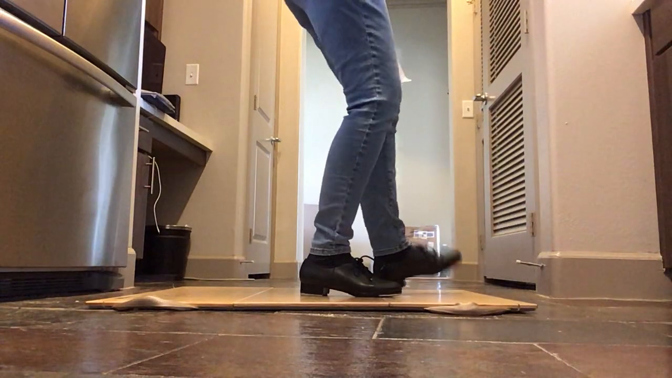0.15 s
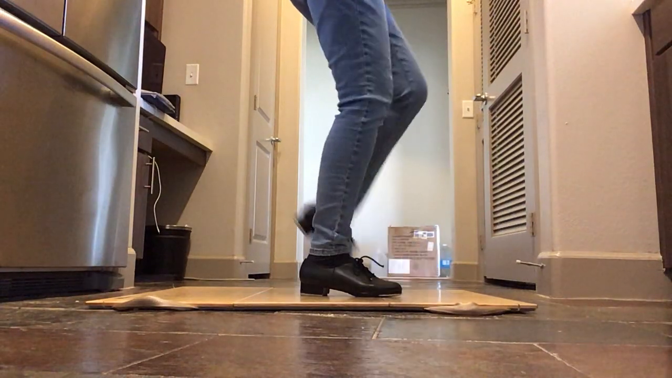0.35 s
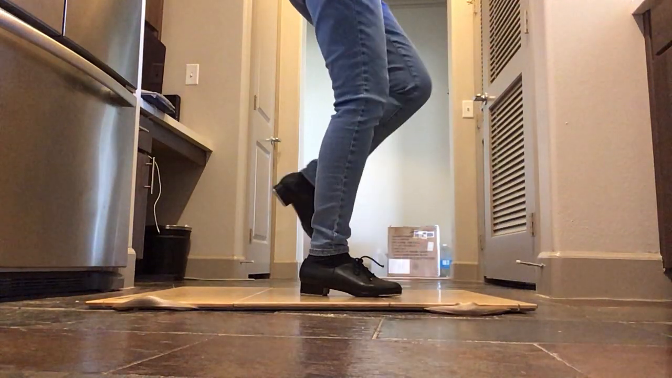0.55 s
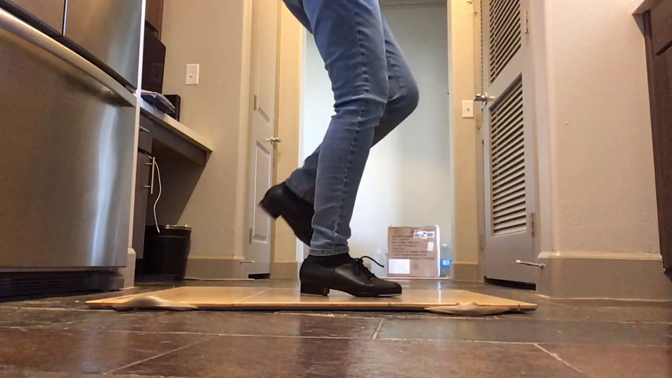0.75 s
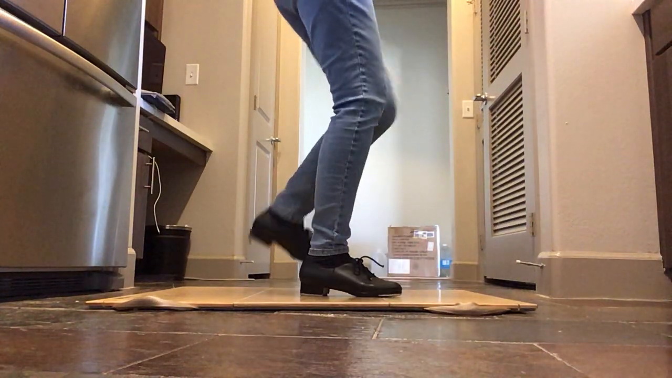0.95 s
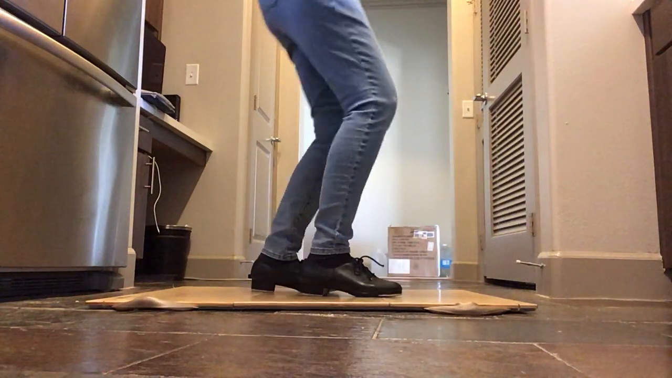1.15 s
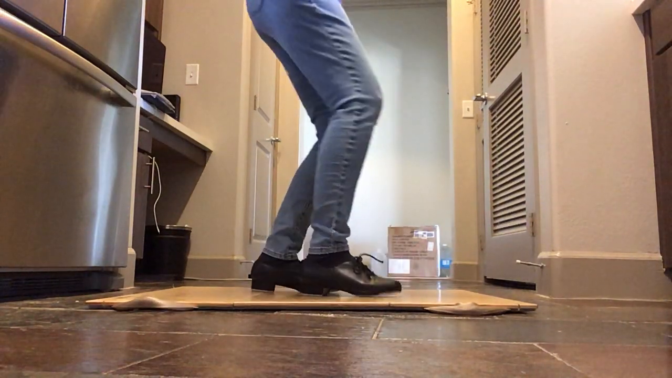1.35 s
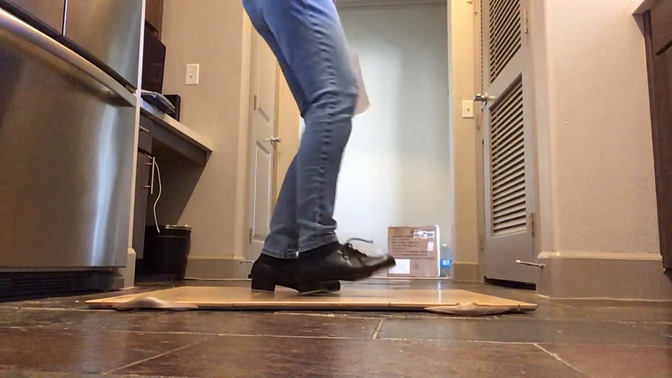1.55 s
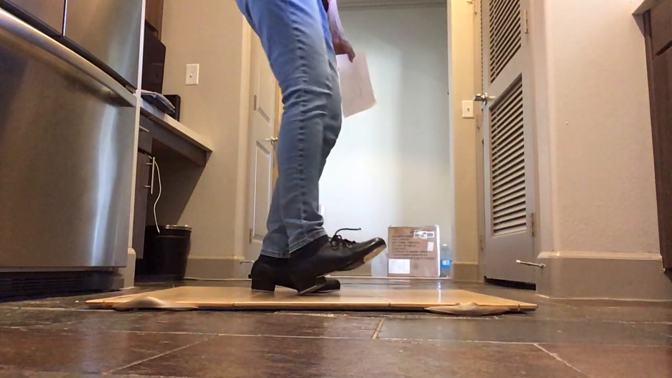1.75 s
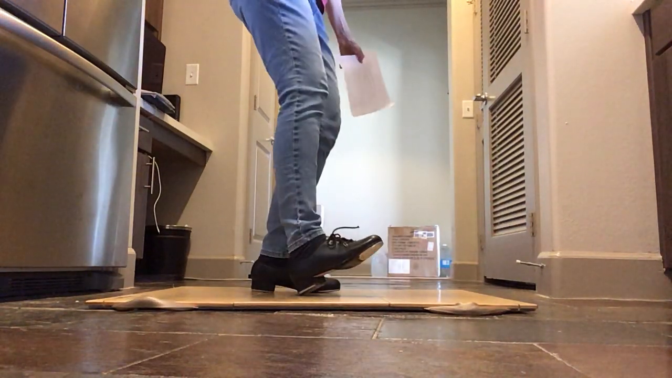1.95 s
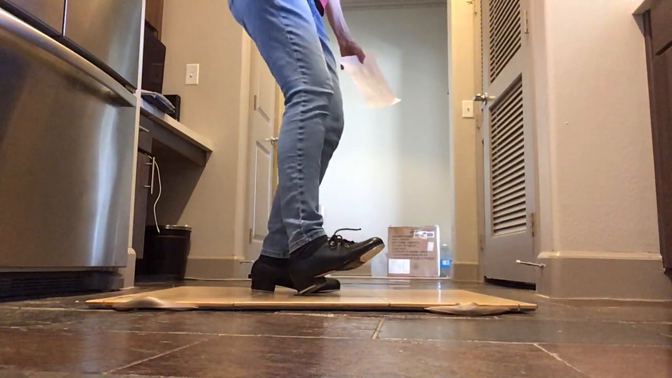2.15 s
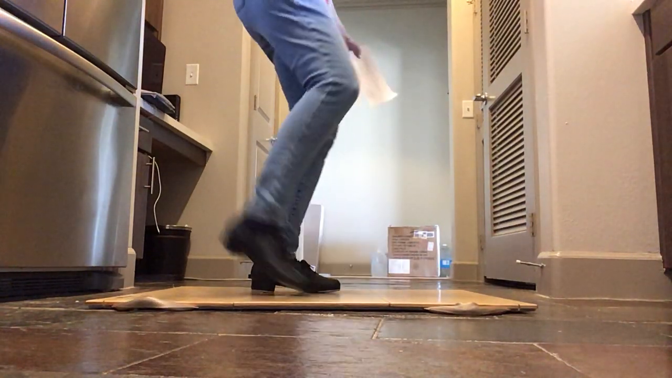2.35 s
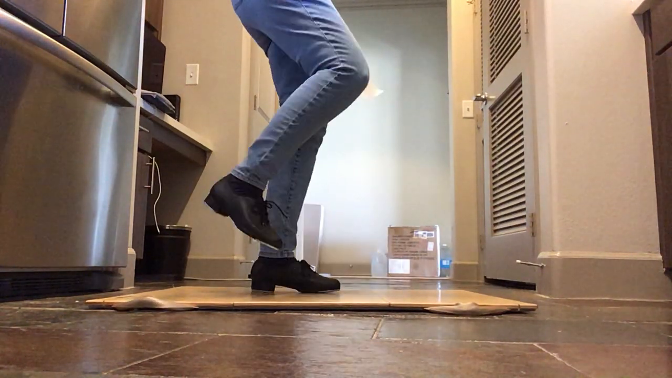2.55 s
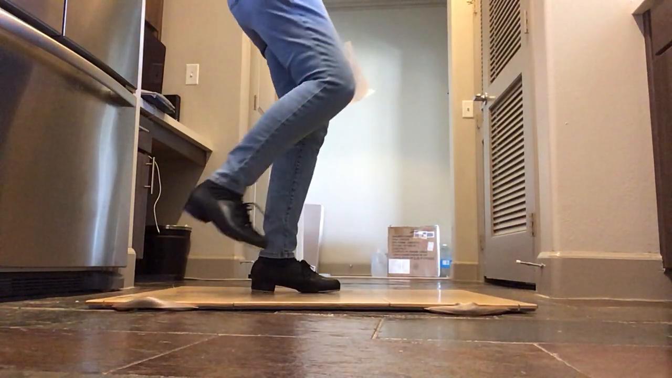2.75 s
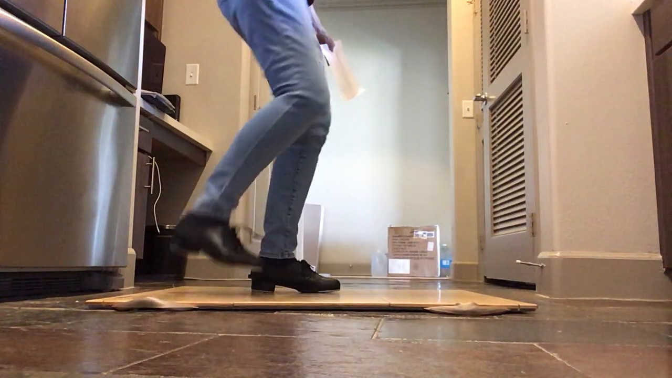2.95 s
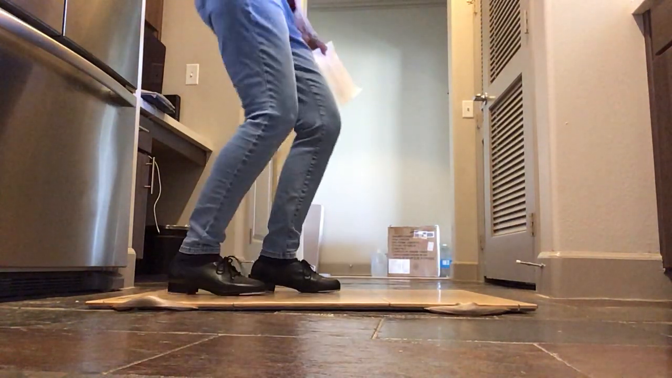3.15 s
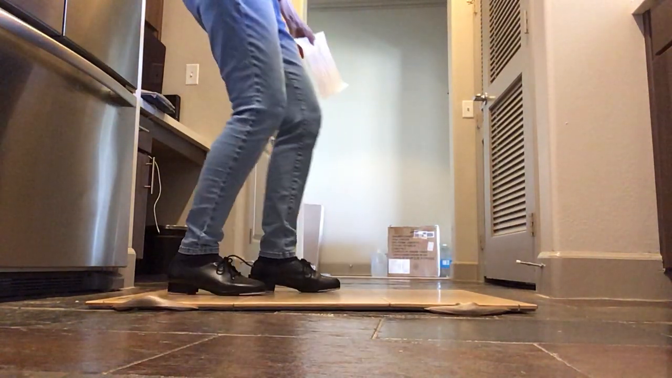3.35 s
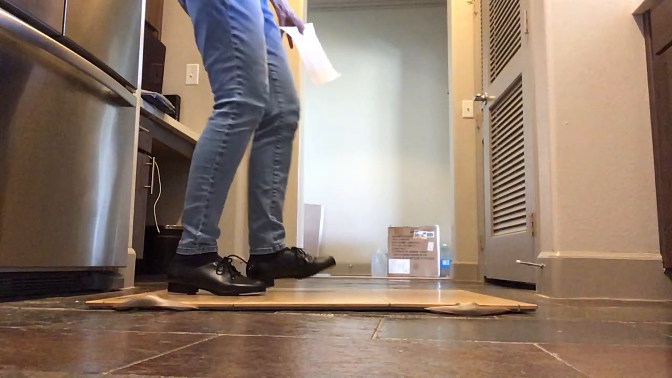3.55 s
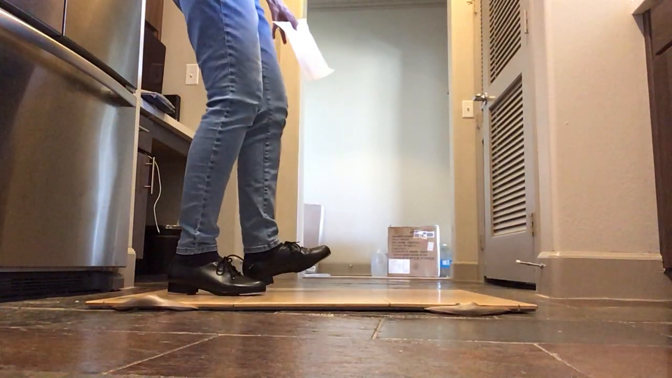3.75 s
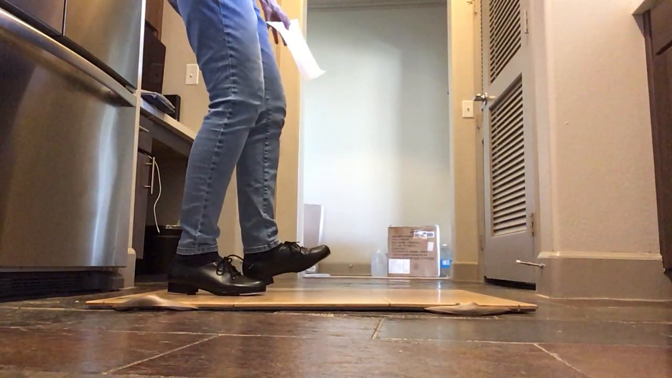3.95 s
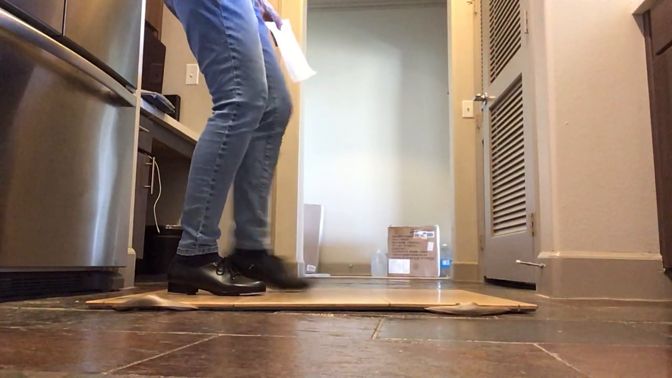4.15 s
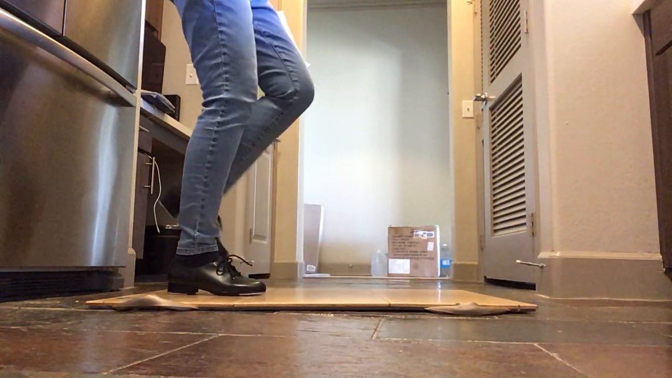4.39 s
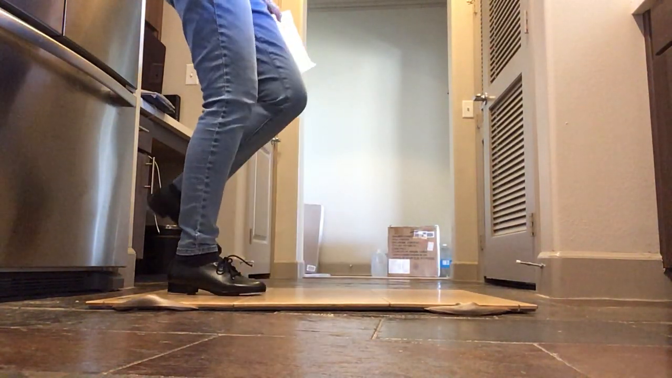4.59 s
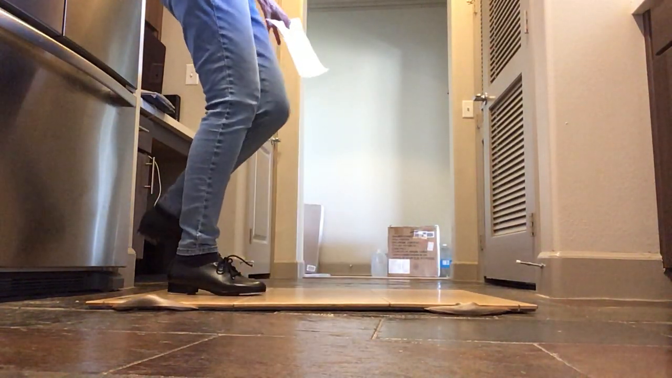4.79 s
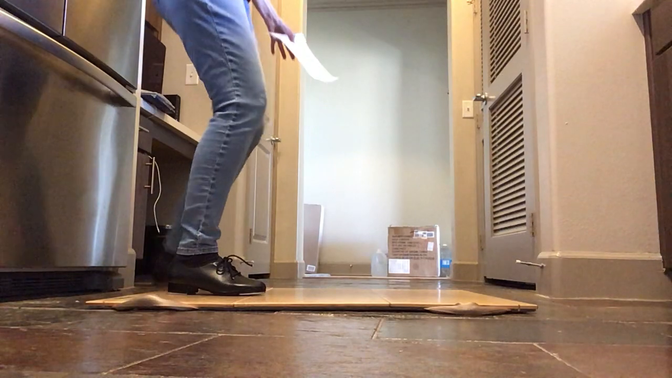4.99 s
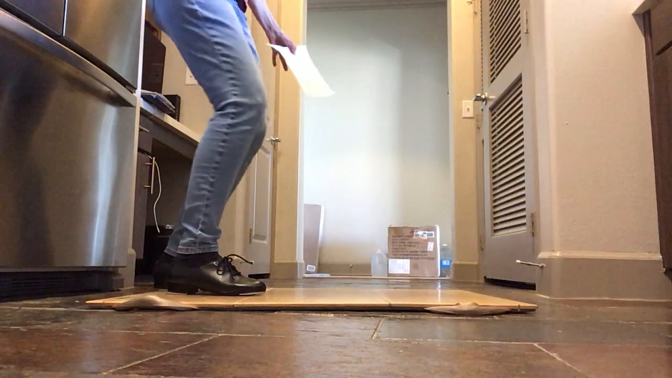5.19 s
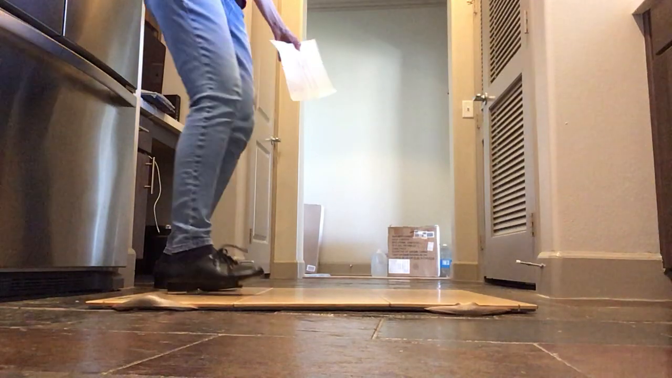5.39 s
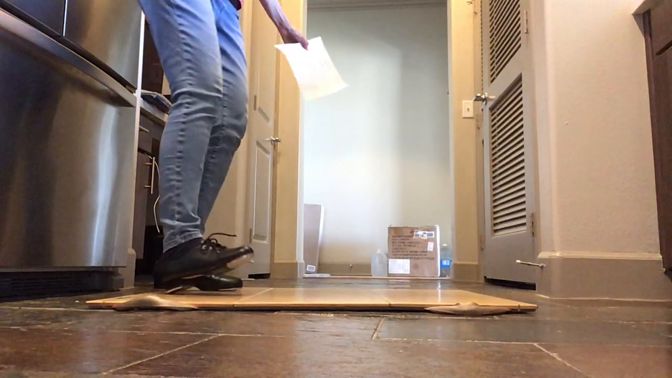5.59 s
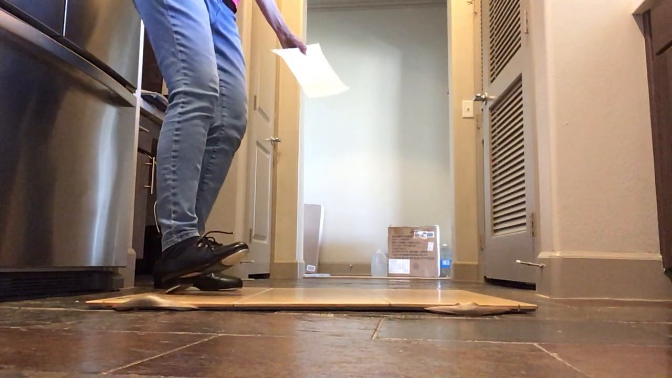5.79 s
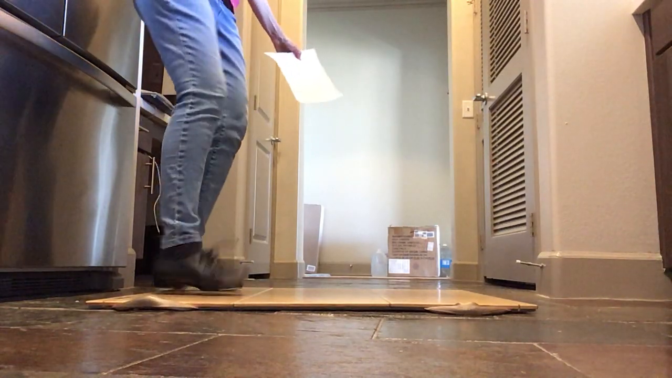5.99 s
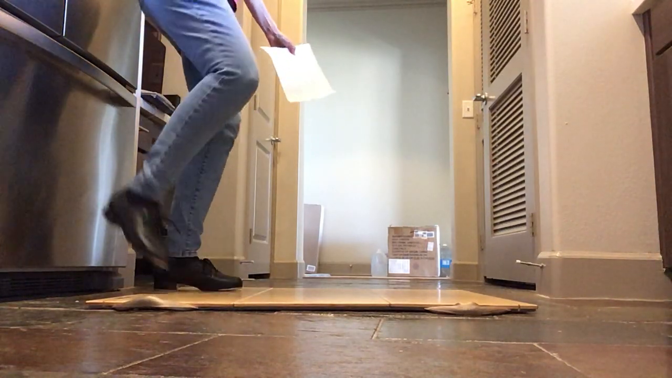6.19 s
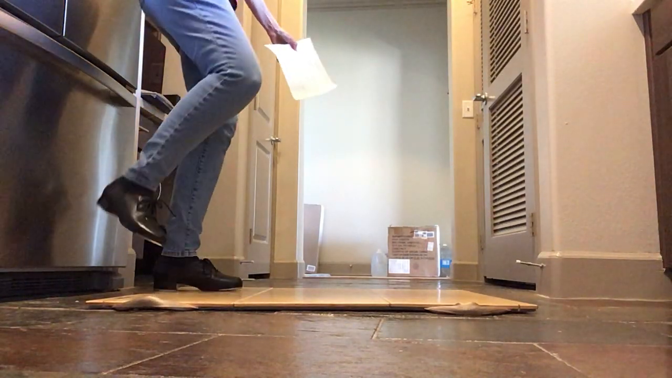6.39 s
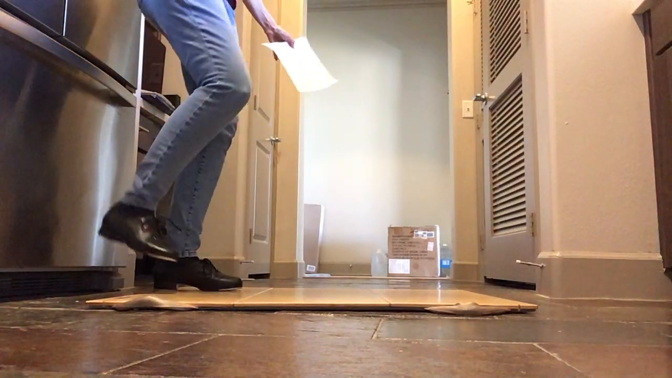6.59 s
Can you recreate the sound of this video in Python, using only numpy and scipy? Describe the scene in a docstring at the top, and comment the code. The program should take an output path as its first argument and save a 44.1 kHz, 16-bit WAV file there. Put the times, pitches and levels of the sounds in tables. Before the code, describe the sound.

Indoors, close to the floor, metal-plated shoes strike a plywood board seven times, roughly one second apart. Crisp forward and backward brushes alternate with slightly weightier, softer steps. Each tap is a very short metallic crack with a hollow woody knock, followed by a bright, quickly fading echo from hard walls. Faint sole scuffs come just before the brushes. Low appliance hum and slight hiss stay beneath.

```python
"""Seven slow taps of metal-plated shoes on a plywood board in a tiled hallway, heard from the floor.
Each tap is a few metal contacts milliseconds apart, made of plate ring and a noisy crack,
and blows set the board's own tones ringing. Soles scuff the wood before the brushing taps; short puffs
of band noise, most of them faint, join in. The hard walls answer with a bright tail of echoes and fading
noise. Appliances hum low, as narrow bands of noise, under the microphone hiss."""
import sys
import numpy as np
from scipy import signal
from scipy.fft import rfft, irfft
from scipy.io import wavfile
from scipy.ndimage import uniform_filter1d

SR = 44100
rng = np.random.default_rng(int(sys.argv[2]) if len(sys.argv) > 2 else 0)


def unload_audio(sound):
    """Save the sound as a 16-bit wav file, at the path given as the first command line argument."""
    columns = np.transpose(np.atleast_2d(sound))
    # keep every value between -1 and 1, then stretch to whole-number steps
    steps = np.round(np.clip(columns, -1, 1) * 32767)
    wavfile.write(sys.argv[1], SR, steps.astype(np.int16))


def magnitude_from_level(level_db):
    """Linear magnitude for a level in decibels (20 dB per decade)."""
    exponent = np.asarray(level_db, float) / 20
    return 10 ** exponent


N = 292383  # length of the scene in samples

# All levels are relative: later stages add to them.
# Toe plate swept across the wood. Each row: start in seconds, level in dB, plate pitch at first touch in Hz,
# length of the roll in seconds, brightness of the crack in dB per octave.
BRUSHES = [(0.3181, -7.5, 2290, 0.0021, 2.5), (2.3655, -7, 2680, .0026, 2),
           (4.2546, -6.5, 2204, .0024, 1.6), (6.1166, -9.5, 2360, .0015, 0)]
# Foot set down with weight. Each row: the same columns as the brushes.
STEPS = [(1.1993, -10, 1995, 0.0027, 1.1), (3.1625, -9, 2155, .0038, 0.83),
         (5.1015, -13.5, 1410, .0046, 0.75)]
# The plate rolls from edge to flat, one touch a row. Each row: share of the roll time gone by,
# how flat the plate lies from 0 to 1, ring level in dB, crack level in dB.
BRUSH_ROLL = [(0, 0, -3, -0.5), (1.0, 1.0, -1, -2), (1.8, 0.99, -16, -7.5)]
STEP_ROLL = [(0, 0, -4, -7), (.3, .3, -5, -6), (.55, .1, -7.5, -6.5), (1.0, 0.96, -2.5, 2.35)]
BRUSH_FLAT_HZ, STEP_FLAT_HZ = 2700, 2990  # plate pitch once it lies flat
# Tones of the metal plate. Each row: multiple of its pitch, level in dB, time to fall 60 dB in seconds.
PLATE_TONES = [(1.0, 2.5, 0.0056), (1.448, -10, 0.004), (2.402, -17, .005)]
# Colour of metal cracking on wood. Each row: frequency in Hz, level in dB.
CRACK_COLOUR = [(300, -28.5), (1200, -15), (2500, 1.7), (4500, 7), (6500, 4), (9000, -2.6), (12000, -4.5),
                (16000, -14)]

# Blows on the board. Each row: start in seconds, level in dB, tilt in dB per octave,
# weight from 0 to 1, spot struck as a share of the board length.
BLOWS = [(0.3183, -20, 1.25, 0.67, .33), (1.198, -21, -2, 0.78, 0.3), (2.366, -23, 2.1, 0.2, .31),
         (3.1627, -23, -1.1, 1, .76), (3.503, -51, -10.5, .05, .3), (4.255, -19, -2.15, 0, .32),
         (5.1017, -27.5, -2, 0.9, 0.725), (6.1171, -29.5, 6.8, 0, 0.35)]
# Ringing modes of the board. Each row: frequency in Hz, level in dB, time to fall 60 dB in seconds.
BOARD_MODES = [(115, -2, 0.24), (133, -6.5, 0.12), (175, 1, 0.098), (222, 0, 0.14), (268, -4.5, 0.23),
               (296, -4.5, 0.18), (334, -5, .15), (381.6, -5.5, 0.13), (420.8, -5, 0.14), (462, 0, 0.05),
               (551, -1, 0.052), (626, 0.5, .06), (718, 3.5, 0.033), (992, -4.5, 0.033),
               (1144, -3.5, 0.015), (1390, -7.5, 0.054), (1844, -2.5, 0.023)]
# How a landing drives the board, glancing or weighted. Each row: frequency in Hz, level in dB.
GLANCING = [(110, -18), (250, -4.5), (430, -2), (680, 0.2), (1300, -6)]
WEIGHTED = [(110, -10), (250, -3), (430, 0.1), (680, -2), (1300, 8)]
NODE_LEAK = 0.23  # what a mode still gives when struck on its still line

# Soles grazing the wood just before a brush. Each row: time of the peak in seconds, level in dB.
SCUFFS = [(.263, -54), (2.314, -55), (4.197, -55), (6.064, -59)]
# Colour of the scuffs. Each row: frequency in Hz, level in dB.
SCUFF_COLOUR = [(100, -9), (300, 8), (550, 8), (1000, -6), (2700, -5), (5000, -19), (9000, -36),
                (16000, -54)]
SCUFF_RISE_S, SCUFF_FALL_S = 0.011, 0.005
# Short puffs of band noise, most of them faint. Each row: start in seconds, level in dB,
# centre in Hz, width in Hz.
PUFFS = [(0.294, -62, 2600, 2000), (1.069, -71.5, 2194, 1480), (3.54, -69, 12840, 6015),
         (3.547, -83, 11480, 6000), (3.565, -82.5, 12040, 7070), (4.232, -48, 2400, 1496),
         (4.938, -61, 2800, 3060), (5.674, -70.5, 2930, 2440)]

# First echoes from the walls. Each row: delay in seconds, level in dB.
ECHOES = [(.0071, -14), (.0105, -13), (0.0164, -12), (.0185, -13), (.024, -13)]
# How long the hallway rings. Each row: frequency in Hz, time to fall 60 dB in seconds.
HALL_FADE = [(100, 1), (300, 0.94), (800, 0.53), (2000, 0.37), (5000, 0.26), (9000, 0.27), (15000, 0.31)]
# Colour of the whole ringing tail. Each row: frequency in Hz, level in dB.
TAIL_COLOUR = [(100, -5), (300, -7.5), (800, 1.8), (1500, -2.5), (2600, -8), (4000, 3.65), (6500, 0.7),
               (10000, 5.5), (15000, -2)]
# The larger rooms beyond ring on. Each row: frequency in Hz, time to fall 60 dB in seconds.
BEYOND_FADE = [(200, 0.25), (1000, 0.79), (4000, 0.76), (8000, 0.61), (12000, 0.32), (15500, .28)]
BEYOND_DB = 4  # energy of the rooms beyond, against the hallway
DIRECT_DB = 3  # sound that reaches the microphone without a reflection

# Colour of the rumble and hiss. Each row: frequency in Hz, level in dB per Hz, before evening out.
AIR_COLOUR = [(18, -50.5), (30, -22), (43, -15.5), (90, -12), (109, -9.5), (174, -9.5), (204, 0),
              (266, -23.5), (295, -15.5), (461, -34.5), (512, -27), (889, -34.5), (1590, -37.5),
              (14800, -49), (16000, -58)]
AIR_DB = -58.5
# Wavering appliance tones. Each row: centre in Hz, width in Hz, level in dB.
HUMS = [(64, 4.8, -76.5), (118, 1.5, -66.5), (183, 33, -76)]


def evened(x):
    """Scale a sound to an average (rms) strength of 1."""
    return x / np.sqrt(np.mean(x ** 2) + 1e-20)


def read_curve(points, hz):
    """Read a table between its points, on a logarithmic frequency scale."""
    table_hz, value = np.transpose(points)
    return np.interp(np.log(hz + 1), np.log(table_hz + 1), value)


def add(mix, start_s, sound):
    """Lay a sound into the mix at its start time, cut off at the end of the mix."""
    part = mix[round(start_s * SR):][:len(sound)]
    part += sound[:len(part)]


def ring(hz, db, t60):
    """One dying tone: a sine that falls 60 dB in t60 seconds."""
    t = np.arange(SR // 2) / SR
    return magnitude_from_level(db - 60 * t / t60) * np.sin(2 * np.pi * hz * t)


def coloured(points, size):
    """Noise with the given balance of bass and treble, at rms 1."""
    hz = np.fft.rfftfreq(size, 1 / SR)
    spectrum = rfft(rng.standard_normal(size)) * magnitude_from_level(read_curve(points, hz))
    return evened(irfft(spectrum, size))


def strike(plate_db, pitch_hz, crack_db, tilt_db):
    """One metal contact: the powers of plate ring and broad crack add up, in a pulse that starts at once."""
    hz = np.fft.fftfreq(2048, 1 / SR)
    power = np.zeros(2048)
    for multiple, db, t60 in PLATE_TONES:
        tone = ring(multiple * pitch_hz, plate_db + db, t60)[:2048]
        power += abs(np.fft.fft(tone)) ** 2
    octaves = np.log2(np.maximum(abs(hz), 1500) / 4000)
    power += magnitude_from_level(2 * (crack_db + read_curve(CRACK_COLOUR, abs(hz)) + tilt_db * octaves))
    # minimum phase: these phases put the energy as early as the colour allows
    level = np.log(power) / 2
    phase = -signal.hilbert(level).imag
    return np.fft.ifft(np.exp(level + 1j * phase)).real[:1024]


def touches(roll, flat_hz, start_s, db, edge_hz, roll_s, tilt_db):
    """The contacts of one tap; the plate rings higher the flatter it lies."""
    contacts = []
    for share, flat, ring_db, crack_db in roll:
        pitch_hz = edge_hz * (flat_hz / edge_hz) ** flat
        contact = strike(db + ring_db, pitch_hz, db + crack_db, tilt_db)
        contacts.append((start_s + share * roll_s, contact))
    return contacts


def knock(blow_db, tilt_db, weight, spot):
    """The blow spreads through the board, so each mode sets in a little apart and the bass builds slowly."""
    t = np.arange(SR // 2) / SR
    out = np.zeros(SR)
    lowest_hz = BOARD_MODES[0][0]
    for k, (hz, db, t60) in enumerate(BOARD_MODES):
        landing_db = (1 - weight) * read_curve(GLANCING, hz) + weight * read_curve(WEIGHTED, hz)
        drive_db = blow_db + tilt_db * np.log2(hz / 430) + landing_db
        # the spot struck decides how strongly each mode answers
        shape = np.hypot(NODE_LEAK, np.sin(np.pi * spot * np.sqrt(hz / lowest_hz)))
        build_up = np.minimum(t * hz / 0.5, 1)  # over half a cycle
        mode = (-1) ** k * shape * ring(hz, db + drive_db, t60) * build_up
        add(out, rng.uniform(0, 0.4) / hz, mode)
    return out[:SR // 2]


def scuff(db, rise, fall):
    """Gritty friction noise that swells and fades."""
    t = np.arange(8192) / SR - 3 * rise  # zero at the peak
    stroke = np.where(t < 0, np.exp(-(t / rise) ** 2), np.exp(-t / fall))
    grit = magnitude_from_level(3 * evened(uniform_filter1d(rng.standard_normal(8192), size=60)))
    return magnitude_from_level(db) * stroke * grit * coloured(SCUFF_COLOUR, size=8192)


def puff(db, hz, width):
    """Band noise that starts at once and dies away at 60 dB in 26 milliseconds, cut off just before."""
    band = [(20, -40), (max(hz - width, 200), -12), (hz, 0), (hz + width, -12), (hz + 3 * width, -45)]
    t = np.arange(1024) / SR
    return magnitude_from_level(db - 60 * t / 0.026) * coloured(band, size=1024)


def feet():
    """Every dry sound ahead of the echoes, with its start time."""
    sounds = []
    for row in BRUSHES:
        sounds += touches(BRUSH_ROLL, BRUSH_FLAT_HZ, *row)
    for row in STEPS:
        sounds += touches(STEP_ROLL, STEP_FLAT_HZ, *row)
    sounds += [(start_s, knock(*row)) for start_s, *row in BLOWS]
    for peak_s, db in SCUFFS:
        sounds.append((peak_s - 3 * SCUFF_RISE_S, scuff(db, SCUFF_RISE_S, SCUFF_FALL_S)))
    sounds += [(start_s, puff(*row)) for start_s, *row in PUFFS]
    return sounds


def fading(t60s, hz, t):
    """Power over bands and time: each band dies at its own speed with energy 1."""
    t60 = read_curve(t60s, hz)[:, None]
    energy = t60 * SR / (6 * np.log(10))
    return magnitude_from_level(-120 * t / t60) / energy


def hallway(dry):
    """Each sound leaves the shoe in other directions, so it meets its own set of reflections."""
    t = np.arange(SR) / SR
    # the tail: noise whose bands fade at different speeds
    hz, frames, noise = signal.stft(rng.standard_normal(SR), SR, nperseg=256)
    power = fading(HALL_FADE, hz, frames) + magnitude_from_level(2 * BEYOND_DB) * fading(BEYOND_FADE, hz, frames)
    tail = noise * np.sqrt(power) * magnitude_from_level(read_curve(TAIL_COLOUR, hz))[:, None]
    answer = signal.istft(tail, SR, nperseg=256)[1][:SR]
    answer *= np.clip((t - 0.002) / 0.0091, 0, 1)  # reflections thicken gradually
    for delay_s, db in ECHOES:
        # doors and louvres break each echo up
        smear = rng.standard_normal(64) * np.exp(-t[:64] / 0.00052)
        echo = magnitude_from_level(db) * smear / np.linalg.norm(smear)
        add(answer, delay_s * rng.uniform(0.94, 1.02), echo)
    # the direct path skims the floor and loses treble
    grazing = np.exp(-t[:64] * 2 * np.pi * 16000)
    answer[:64] += magnitude_from_level(DIRECT_DB) * grazing / grazing.sum()
    # treble scattered by shoe and tiles
    scattered = np.diff(rng.standard_normal(513))
    answer[:512] += magnitude_from_level(-16 - 60 * t[:512] / 0.02) * scattered
    return signal.fftconvolve(dry, answer)


def background():
    """Rumble and hiss, with narrow bands of noise for the hums."""
    hz = np.fft.rfftfreq(N, 1 / SR)
    out = magnitude_from_level(AIR_DB) * coloured(AIR_COLOUR, size=N)
    for centre_hz, width_hz, db in HUMS:
        band = np.exp(-((hz - centre_hz) / width_hz) ** 2)
        hum = irfft(rfft(rng.standard_normal(N)) * band, N)
        out += magnitude_from_level(db) * evened(hum)
    return out


def scene():
    """Feet, their echoes and the house."""
    steps = np.zeros(N)
    for start_s, dry in feet():
        add(steps, start_s, hallway(dry))
    # the board radiates little below its lowest mode
    bass_cut = signal.butter(4, 80, "high", fs=SR, output="sos")
    steps = signal.sosfilt(bass_cut, steps)
    return (steps + background())[None]


def low_pass(x):
    """Removes everything above the highest recorded frequency."""
    return signal.sosfilt(signal.butter(12, 17000, fs=SR, output="sos"), x)


def record(dry):
    """Deep bass and the treble above 16 kHz are filtered out and the highest peaks rounded off."""
    ceiling = 0.9  # full scale is 1
    bass_cut = signal.butter(2, 45, "high", fs=SR, output="sos")
    treble_cut = signal.cheby2(14, 40, 16100, "low", fs=SR, output="sos")
    heard = signal.sosfilt(bass_cut, dry)
    heard = ceiling * np.tanh(heard / ceiling)
    heard = signal.sosfilt(treble_cut, heard)
    return low_pass(heard)


dry = scene()
out = record(dry)
unload_audio(out)
```